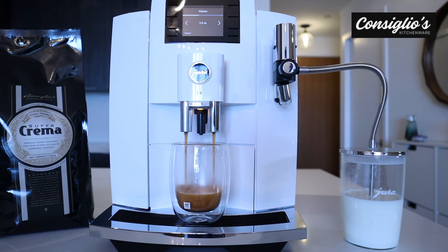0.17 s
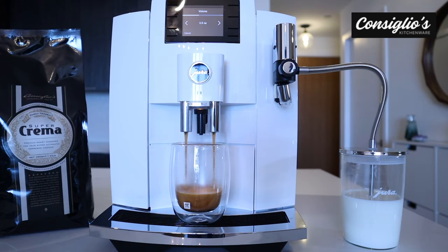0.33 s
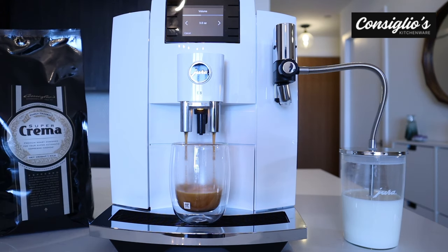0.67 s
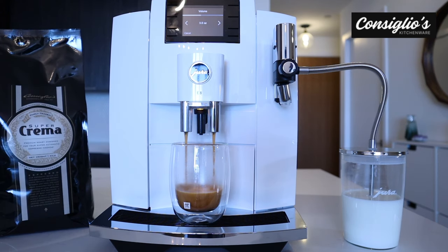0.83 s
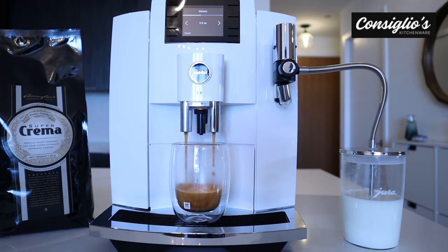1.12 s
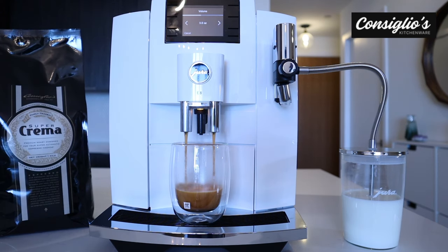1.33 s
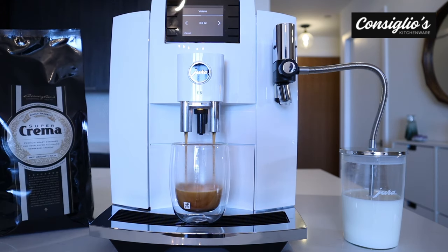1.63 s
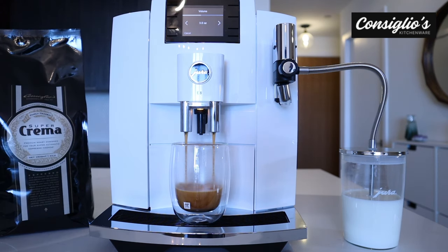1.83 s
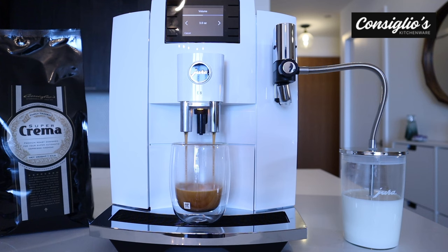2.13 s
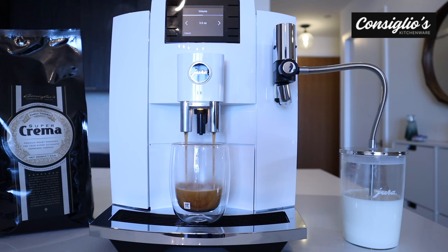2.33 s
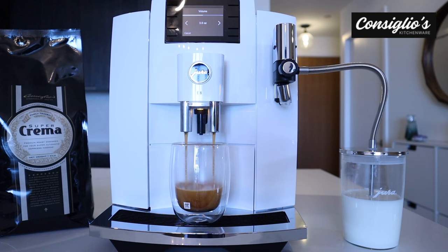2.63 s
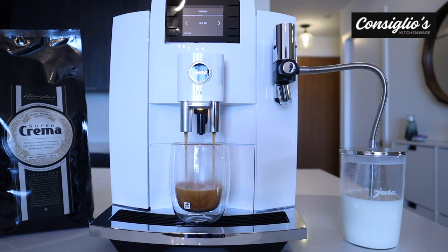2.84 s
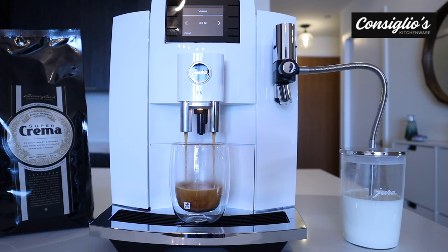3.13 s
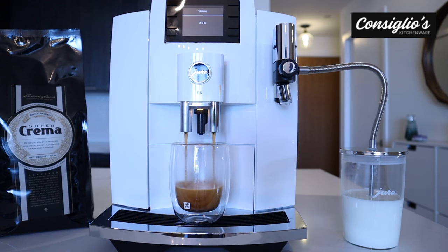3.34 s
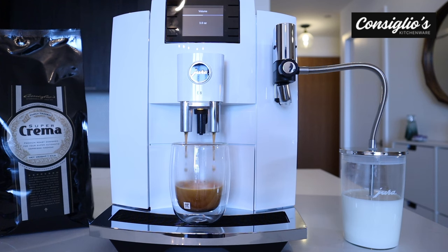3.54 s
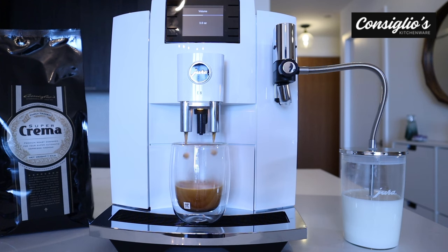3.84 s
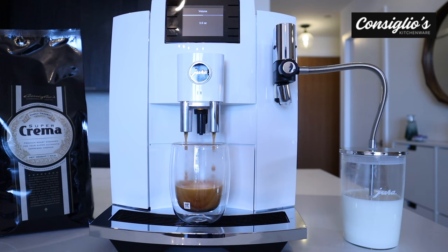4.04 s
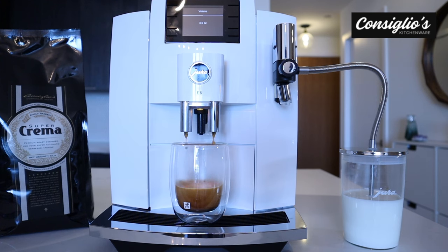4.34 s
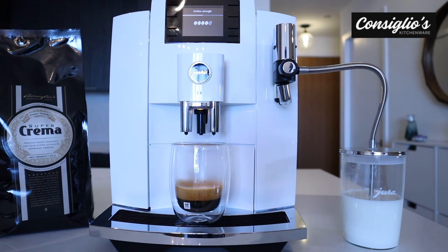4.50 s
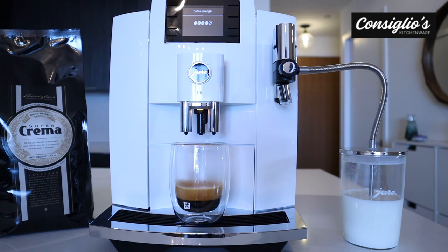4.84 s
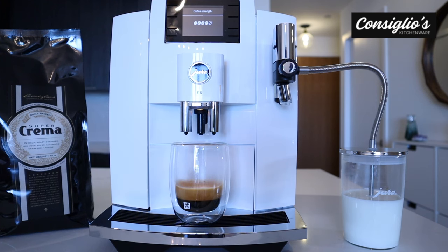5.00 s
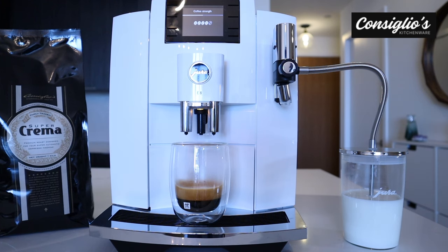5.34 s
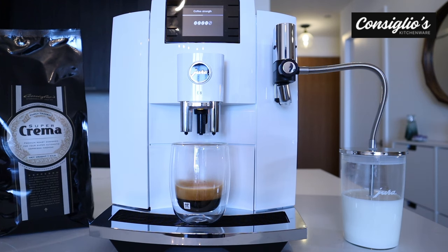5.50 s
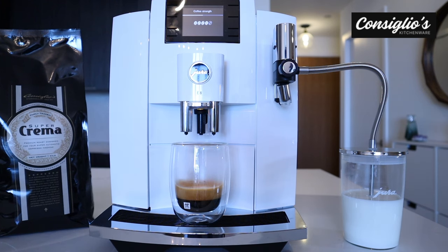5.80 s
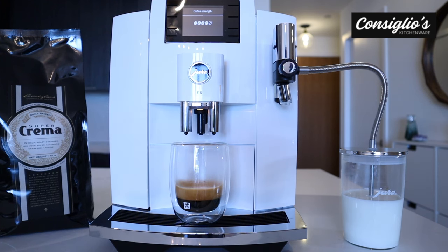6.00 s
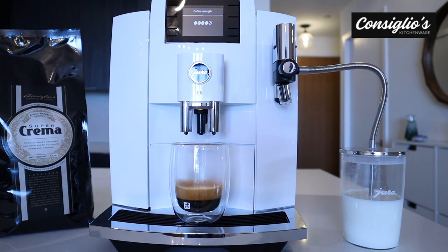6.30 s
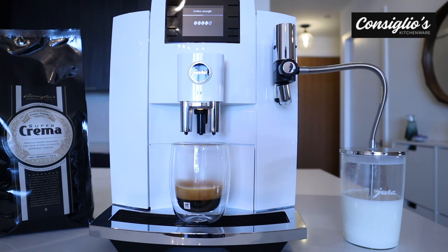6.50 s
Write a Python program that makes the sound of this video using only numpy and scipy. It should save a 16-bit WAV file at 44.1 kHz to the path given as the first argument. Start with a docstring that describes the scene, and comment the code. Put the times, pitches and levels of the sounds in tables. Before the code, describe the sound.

Rattling coffee machine pump and dribbling coffee, a quiet pause of clacks and drips, then a sudden harsh bean grinder with whine and squeals.

```python
"""Espresso machine, then grinder

An automatic espresso machine in a kitchen. Its vibration pump strokes on two mains cycles out of three, each stroke
ringing plunger and housing and squirting hiss, while coffee drips into a glass. The machine knocks, as struck modes,
when the pump stumbles and after it stops; valves snap as bursts of noise and the last drops fall. A thin whistle
rises and a relay clicks; then the grinder cracks beans in random clicks and noise, with whine, hum and squeals."""
import sys
import numpy as np
from scipy import signal
from scipy.fft import rfft, irfft, next_fast_len
from scipy.io import wavfile

SR = 44100
rng = np.random.default_rng(int(sys.argv[2]) if len(sys.argv) > 2 else 0)


def persist_wave(psi):
    """Save psi, clipped to +-1, as 16-bit WAV."""
    counts = np.round(np.clip(psi, -1, 1) * 32767).astype(np.int16)
    wavfile.write(sys.argv[1], SR, np.atleast_2d(counts).T)


N = 293706
MAINS_HZ = 60.015


def amp(db):
    """Turns dB into gain."""
    return 10 ** (np.asarray(db) / 20)


def rms_one(x):
    """Scales a sound to rms 1."""
    return x / np.sqrt(np.mean(x ** 2) + 1e-20)


def in_time(rows):
    """Draws straight lines between table rows: one curve per column after the time."""
    s, *columns = np.transpose(rows)
    return [np.interp(np.arange(N) / SR, s, column) for column in columns]


def ramp(s, length):
    """Rises from 0 to 1, starting at s."""
    return np.clip((np.arange(N) / SR - s) / length, 0, 1)


def clicks(s, size):
    """Single-sample impulses at the given times."""
    out = np.full(N, 1e-18)
    np.add.at(out, np.clip((np.asarray(s) * SR).astype(int), 0, N - 1), size)
    return out


def grains(per_s, spread_db):
    """Random clicks of either sign, mostly small, a few large."""
    sizes = amp(spread_db * np.minimum(rng.exponential(1, N), 4)) * rng.choice([-1, 1], N)
    return sizes * (rng.random(N) < per_s / SR) + 1e-18


def drift(rate):
    """Random wander of rms 1, faster for a higher rate."""
    r = np.exp(-80 * np.pi * rate / SR)   # one step every 40 samples
    steps = rng.standard_normal(N // 40 + 2002)
    slow = signal.lfilter([1], [1, -2 * r, r * r], steps)[2000:]
    return np.interp(np.arange(N) / 40, np.arange(len(slow)), rms_one(slow))


def ring(x, hz, t60):
    """A unit click sets a sine of height 1 ringing; it falls 60 dB in t60 seconds."""
    r = 10 ** (-np.log10(1000) / (t60 * SR))
    w = 2 * np.pi * hz / SR
    return signal.lfilter([0, np.sin(w)], [1, -2 * r * np.cos(w), r * r], x)


def strike(s, db, modes, scatter_db, sense=-1):
    """Each blow strikes every mode with a strength of its own; with sense -1 neighbouring modes start opposed."""
    scatter = scatter_db * rng.standard_normal((len(s), len(modes)))
    out = 0
    for k, (hz, level_db, t60) in enumerate(modes):
        blows = clicks(s, amp(db + level_db + scatter[:, k]))
        out = out + sense ** k * ring(blows, hz, t60)
    return out


def fade(x, t60):
    """Envelope that jumps at each click and dies away."""
    return signal.lfilter([1], [1, -amp(-60 / (t60 * SR))], x)


def soften(x, hz):
    """A yielding contact: two one-pole low-passes."""
    r = np.exp(-2 * np.pi * hz / SR)
    return signal.lfilter([(1 - r) ** 2], [1, -2 * r, r * r], x)


def dip(x, hz, width, depth):
    """Takes away part of a narrow band."""
    return x - np.clip(depth, 0, 1) * signal.lfilter(*signal.iirpeak(hz, hz / width, fs=SR), x)


def hiss(spectrum, envelope):
    """Half-octave bands of noise, together rms 1 before each is shaped by envelope(Hz)."""
    edges = 24 * 2 ** np.arange(0, 9.6, .5)
    white = rng.standard_normal((2, N))   # neighbouring bands use different noise
    centres = np.sqrt(edges[1:] * edges[:-1])
    hz, db = np.transpose(spectrum)
    gains = amp(np.interp(np.log(centres), np.log(hz), db))
    gains /= np.sqrt(np.sum(gains ** 2 * np.diff(edges)) * 2 / SR)
    out = 0
    for k, (gain, centre, low, high) in enumerate(zip(gains, centres, edges, edges[1:])):
        band = signal.butter(2, [low, high], "band", fs=SR, output="sos")
        out = out + gain * envelope(centre) * signal.sosfilt(band, white[k % 2])
    return out


# Colour of the background noise. Each row: pitch in Hz, relative level in dB per Hz.
KITCHEN_COLOUR = [(25, 9), (45, 4), (90, 6.5), (125, 3), (170, 4), (240, 5), (340, 1.5), (500, -3),
                  (800, -12), (1200, -4), (1700, -14.5), (3500, -11.5), (6000, -29), (15500, -72.5)]
# Loudness of the background noise. Each row: time in seconds, level in dB.
KITCHEN_LEVEL = [(2.5, -46), (2.62, -46), (2.75, -51.5), (3.2, -57.5), (3.6, -51), (4.4, -54.5)]
HUM_DB = -59


def kitchen():
    """A low background of flickering noise bands, and a faint sine at twice the mains frequency."""
    noise = hiss(KITCHEN_COLOUR, lambda hz: amp(0.5 * drift(28)))
    hum = amp(HUM_DB + drift(3.2)) * np.sin(4 * np.pi * MAINS_HZ * np.arange(N) / SR)
    return amp(in_time(KITCHEN_LEVEL)[0]) * noise + hum


# How the pump's loudness moves. Each row: time in seconds, housing gain in dB, plunger and squirt gain in dB.
PUMP_LEVEL = [(0.0, -2, -0.5), (2.5, -0.5, 0)]
# Runs in which every third mains cycle is a rest. Each row: first resting cycle, last resting cycle.
RESTS = [(-29, 10), (12, 57), (62, 107), (109, 151)]
# Housing shaken by the pump. Each row: pitch in Hz, relative level in dB, time to fall 60 dB in seconds.
HOUSING = [(58, -49, 0.35), (96.4, -42, 0.48), (120.8, -57, 0.66), (159.8, -24.5, 0.37),
           (178.15, -26.5, 0.25), (251.6, -33, 0.42), (296.2, -33, 0.13), (320.9, -39.5, 0.31),
           (341.7, -41.5, 0.37), (377, -36, 0.063), (446.6, -39, 0.12), (462.5, -42.5, 0.18),
           (518.6, -40.5, 0.35), (551, -40, 0.54), (596, -41, 0.2), (668, -53, 0.23), (734, -51, 0.2),
           (837, -50, 0.15)]
# Plunger and spring. Each row: pitch in Hz, relative level in dB, time to fall 60 dB in seconds.
PLUNGER = [(1170, -65, 0.078), (1279, -44.5, 0.18), (1341, -45.5, 0.21), (1560, -32, 0.0083),
           (1548, -39.5, 0.068), (1633, -31.5, 0.1), (1720, -45, 0.12), (1824, -36.5, 0.065),
           (1970, -45, 0.1), (2237, -35, 0.023), (2447, -48, 0.17), (2670, -41, 0.07), (2870, -43, 0.016),
           (3860, -53, 0.079), (4395, -51.5, 0.054), (5200, -75, 0.028), (6000, -54, 0.023),
           (6470, -43.5, 0.019), (8450, -51, 0.037)]
# Water forced through the valve. Each row: pitch in Hz, relative level in dB per Hz.
SQUIRT = [(300, -45), (600, -5), (850, -11), (1200, -10), (1900, -7), (2700, -9), (4000, -17), (6300, -13),
          (8400, -29), (10000, -30), (11700, -20), (15500, -31)]
FIRST_STROKE_S, STROKE_CYCLES = .0102, 151
SECOND_STROKE_DB, RETURN_S, RETURN_DB = -2, .0065, -8
PULL_S = -0.0027   # the coil pulls shortly before the plunger lands
SHOVE_SCATTER_DB, STUMBLE_DB = .7, 1   # the stroke that opens a new run kicks harder
WANDER_DB = 2.5   # each housing mode above 200 Hz swells and sinks slowly
SQUIRT_DB, FLOW_DB = -42, -49   # bursts at each blow, and a steady flow beneath
TREBLE_FADE = .12   # how much sooner the treble of a squirt dies


def pump():
    """The plunger slams its stop on each powered cycle, springs back and shakes the housing."""
    cycle = np.arange(RESTS[0][0], STROKE_CYCLES)
    rests = np.concatenate([np.arange(first, last + 1, 3) for first, last in RESTS])
    resting = np.isin(cycle, rests)
    strokes = cycle[~resting]
    s = FIRST_STROKE_S + strokes / MAINS_HZ
    after_rest = np.roll(resting, 1)[~resting]
    db = SECOND_STROKE_DB * ~after_rest   # a stroke after a rest lands harder

    lead = SR // 2   # the housing is already ringing at the start
    shoves = np.zeros(N + 2 * lead)
    opens_run = np.isin(strokes, [first - 1 for first, _ in RESTS])
    shove_db = SHOVE_SCATTER_DB * rng.standard_normal(len(s)) + STUMBLE_DB * opens_run
    shoves[(s * SR).astype(int) + lead] = amp(shove_db)
    housing = 0
    for k, (hz, level_db, t60) in enumerate(HOUSING):
        # the pull rocks the whole housing, the rebound rings its panels
        delay_s = PULL_S if hz < 200 else RETURN_S
        ringing = ring(shoves, hz, t60)[lead - int(SR * delay_s):][:N]
        housing = housing + (-1) ** k * amp(level_db + WANDER_DB * (hz > 200) * drift(1.6)) * ringing

    s, db = s[s > 0], db[s > 0]
    s = s + 3e-5 * rng.standard_normal(len(s))
    plunger = strike(s, db, PLUNGER, scatter_db=1.2)
    plunger = plunger + strike(s + RETURN_S, db + RETURN_DB, PLUNGER, scatter_db=2)

    blows = clicks(s, amp(db + 0.64 * rng.standard_normal(len(s)))) + clicks(s + RETURN_S, amp(-10.5))
    spit = 0.27 * drift(37)   # the jet spits unevenly, most in the treble
    flow = amp(FLOW_DB) * np.interp(np.arange(N) / SR, [2.53, 2.65], [1, 0])

    def squirt_envelope(hz):
        burst = soften(fade(blows, 0.069 * (2000 / hz) ** TREBLE_FADE), 320)
        burst = amp(SQUIRT_DB) * burst * amp(np.log2(hz / 500) * spit)
        return burst + flow * (1000 / hz) ** 0.62

    squirt = hiss(SQUIRT, squirt_envelope)
    housing_db, plunger_db = in_time(PUMP_LEVEL)
    return amp(housing_db) * housing + amp(plunger_db) * (soften(plunger, 6600) + squirt)


# Single drops into the glass. Each row: start in seconds, then the levels of snap, glass tone and spray in dB.
DROPS = [(0.0957, -33.5, -55, -48), (0.197, -26.5, -32, -41), (0.317, -35, -43, -52),
         (0.627, -34, -47, -48), (0.648, -26, -17, -40), (0.848, -27, -25, -40), (0.9425, -36, -35, -48),
         (1.026, -26, -35, -42), (1.048, -26.5, -17.5, -42), (1.058, -32, -38, -46), (1.083, -40, -43, -52),
         (1.253, -33, -27, -46), (1.316, -28.5, -24, -46), (1.363, -28, -19, -47), (1.496, -24, -26, -51),
         (1.571, -35, -50, -50), (1.6592, -32, -41, -50), (2.0675, -45, -50, -45), (3.165, -34.5, -39, -51),
         (3.3873, -35, -36, -48), (3.425, -39, -22, -58), (3.4338, -37, -26, -50), (3.4632, -39, -49, -57),
         (3.48, -27.5, -21.5, -45), (3.5, -42, -40, -57), (3.547, -38, -43, -52),
         (3.566, -30.5, -26.5, -44), (3.582, -44, -47, -58), (3.612, -50, -47, -58), (3.653, -45, -44, -60),
         (3.719, -32.5, -31, -56), (3.738, -49, -32, -62), (3.781, -40, -35, -54), (3.802, -43, -36, -58),
         (3.823, -43, -43, -60), (3.8413, -29, -45, -50), (3.965, -41, -44, -60), (3.9935, -44, -55, -62),
         (4.034, -44, -45, -62), (4.0594, -43, -38, -57), (4.1413, -40, -37, -54), (4.197, -41, -37, -60),
         (4.2437, -44, -45, -60), (4.2746, -35.5, -31, -54), (4.291, -47, -33, -60), (4.325, -43, -54, -57),
         (4.35, -50, -48, -65), (4.385, -47, -45, -62), (4.421, -37, -38, -54)]
# Fine spatter, steady within each stage of the brew. Each row: start in seconds, drops per second, level in dB.
SPATTER = [(0, 56, -47), (2.55, 17.6, -73), (3.38, 60, -59)]
# Snap of the surface. Each row: pitch in Hz, relative level in dB, time to fall 60 dB in seconds.
TICK = [(2590, -8, 0.0085), (3300, 1, 0.0036), (3960, -4.5, 0.0054)]
# Air in the glass. Each row: pitch in Hz, relative level in dB, time to fall 60 dB in seconds.
GLASS = [(570, -13.5, 0.029), (987, -5, 0.0078), (1186, -1.5, 0.014), (1650, -25.5, 0.052)]
# Thrown droplets. Each row: pitch in Hz, relative level in dB, time to fall 60 dB in seconds.
SPRAY = [(7240, -1, 0.0043), (8850, 2.5, 0.0045), (11700, 4, 0.0025), (14000, 4, .003)]
SPATTER_END_S = 4.5
SPLASH_S, SPLASH_LENGTH_S, SPLASH_PER_S, SPLASH_DB = 0.96, 0.11, 700, -43   # one burst of spatter
MIST_DB = -23   # gain of the spatter's spray
SNAP_LOW_HZ, SNAP_HIGH_HZ = 1900, 4800   # a snap is thin: little below or above


def drops():
    """Each drop snaps on the surface, throws spray and sounds the air in the glass."""
    t = np.arange(N) / SR
    start, stage_per_s, stage_db = np.transpose(SPATTER)
    stage = np.searchsorted(start[1:], t)
    splash = (t > SPLASH_S) & (t < SPLASH_S + SPLASH_LENGTH_S)
    per_s = np.where(splash, SPLASH_PER_S, stage_per_s[stage])
    small_db = np.where(splash, SPLASH_DB, stage_db[stage])
    small = amp(small_db) * grains(per_s * (t < SPATTER_END_S), spread_db=2)
    patter = sum(amp(db) * ring(small, hz, t60) for hz, db, t60 in TICK)
    plink = sum(amp(db) * ring(small, hz, t60) for hz, db, t60 in GLASS)
    mist = sum(amp(db + MIST_DB) * ring(small, hz, t60) for hz, db, t60 in SPRAY)

    s, snap_db, tone_db, spray_db = np.transpose(DROPS)
    snap = strike(s, snap_db, TICK, scatter_db=3.9, sense=1)
    tone = strike(s, tone_db, GLASS, scatter_db=3.9, sense=-1)
    spray = strike(s, spray_db, SPRAY, scatter_db=3.9, sense=1)
    thin = signal.butter(3, [SNAP_LOW_HZ, SNAP_HIGH_HZ], "band", fs=SR, output="sos")
    snaps = signal.sosfilt(thin, snap + patter)
    return snaps + soften(tone + amp(6) * plink, 4900) + spray + mist


# Knocks of the machine: two as the pump stumbles, the others after it stops. Each row: start in seconds,
# relative level in dB, hardness in dB per octave, pitch favoured by the place of the blow in Hz,
# share of the free ring time.
KNOCKS = [(.236, -29, -3, 595, .3), (1.849, -18, -6, 450, 0.33), (3.191, -47, 0, 330, 0.81),
          (3.222, -24.5, 3, 252, 0.25), (3.432, -38.5, -3, 237, 0.86), (3.49, -41, 2, 240, .7),
          (3.66, -26, 3, 690, 0.76), (3.93, -28.5, 5.5, 960, 0.68), (3.986, -46, -2, 330, 2.7),
          (4.115, -48, 1, 252, 1.4), (4.29, -34, -3, 330, 0.57)]
# Knocked parts of the machine. Each row: pitch in Hz, relative level in dB, free time to fall 60 dB in seconds.
KNOCKED_PARTS = [(231, -22.5, 0.28), (245, -19, 0.11), (326, -18.5, 0.13), (577, -13, 0.079),
                 (666, -15.5, 0.063), (770, -26, 0.04), (950, -17.5, 0.037), (1250, -27, 0.052),
                 (1510, -28, .03), (1800, -13, 0.007), (2150, -29, 0.0076), (2640, -22.5, 0.011),
                 (3000, -34, .01), (3640, -30, 0.0083), (4700, -31, 0.011), (6640, -37, 0.0065)]
FAVOUR_DB, FAVOUR_OCTAVES = 9, 0.35


def knocks():
    """Harder knocks reach the higher modes more strongly; each favours the modes near one pitch and chatters."""
    out, size = np.zeros(N), SR // 2
    for s, db, hard_db, near_hz, share in KNOCKS:
        start = int(s * SR)
        chatter = soften(fade(clicks([0], 0.19), 0.039), 180) * rng.standard_normal(N)
        blow = (clicks([0, .004], 0.71) + chatter)[:size]
        for hz, level_db, t60 in KNOCKED_PARTS:
            favour_db = FAVOUR_DB * np.exp(-(np.log2(hz / near_hz) / FAVOUR_OCTAVES) ** 2)
            mode_db = db + level_db + hard_db * np.log2(hz / 700) + favour_db
            out[start:start + size] += rng.choice([-1, 1]) * amp(mode_db) * ring(blow, hz, t60 * share)
    return out


# Snaps of the valves. Each row: start in seconds, relative level in dB.
VALVES = [(2.579, -38.5), (2.604, -33.5), (2.6795, -35.5), (2.728, -32), (2.823, -30), (2.8635, -34.5),
          (2.909, -46)]
# Colour of a snap. Each row: pitch in Hz, relative level in dB per Hz.
VALVE_COLOUR = [(88, -41), (150, -8), (234, -1.5), (509, -1.5), (796, -11), (948, -6), (2550, -10.5),
                (2920, -10), (3690, -12), (15500, -25)]
# Ringing plastic. Each row: pitch in Hz, relative level in dB, time to fall 60 dB in seconds.
VALVE_BODY = [(502, -29.5, 0.035), (1000, -25, 0.028), (1920, -29, .02), (2600, -28, 0.021)]
VALVE_T60_S = 0.057   # at 2000 Hz
THUD_S, THUD_HZ, THUD_DB, THUD_T60_S = 2.83, 44.8, -35, 1   # the counter takes a soft jolt


def valves():
    """A snap of rattling plastic and released pressure; the treble dies first."""
    length = 9000   # samples
    def envelope(hz):
        t60 = VALVE_T60_S * (2000 / hz) ** .3
        out = np.zeros(N)
        for s, db in VALVES:
            start = int(s * SR)
            out[start:start + length] += amp(db - 60 * np.arange(length) / (SR * t60))
        return out

    pressure = hiss(VALVE_COLOUR, lambda hz: soften(envelope(hz), hz / 4))
    rattle = soften(envelope(1000), 150) * rng.standard_normal(N)
    body = sum(amp(db) * ring(rattle, hz, t60) for hz, db, t60 in VALVE_BODY)
    thud = amp(THUD_DB) * ring(soften(clicks([THUD_S], 0.79), 33), THUD_HZ, THUD_T60_S)
    return pressure + body + thud


# A thin whistle. Each row: pitch in Hz, width of each resonance in Hz, level in dB.
WHISTLE = [(8660, 260, -72), (9620, 280, -74)]
WHISTLE_S, WHISTLE_RISE_S = 3.6, .45


def whistle():
    """Noise passed twice through a narrow resonance."""
    out = 0
    for hz, width, db in WHISTLE:
        t60 = np.log(1000) / (np.pi * width)
        noise = ring(ring(rng.standard_normal(N), hz, t60), hz, t60)
        out = out + amp(db) * rms_one(noise)
    return out * ramp(WHISTLE_S, WHISTLE_RISE_S)


# Relay before the grinder. Each row: start in seconds, relative level in dB, pitch in Hz.
RELAY = [(4.474, -28, 970), (4.4945, -27, 2340), (4.504, -34, 2330), (4.513, -38, 2400), (4.524, -28, 2280)]
RELAY_SWELL_T60_S, RELAY_T60_S = 0.0073, 0.027


def relay():
    """Each contact rings one short note that swells for a moment."""
    out = 0
    for s, db, hz in RELAY:
        swell = ring(clicks([s], 0.03), hz, RELAY_SWELL_T60_S)
        out = out + amp(db) * ring(swell, hz, RELAY_T60_S)
    return out


SWAY_SHARE, SWAY_PER_S = .035, 5   # the low hopper modes shift in pitch as the beans shift


def sway(x, hz):
    """Reads a mode up to 1000 Hz a little faster or slower, so that its pitch wanders."""
    if hz > 1000:
        return x
    return np.interp(np.cumsum(1 + SWAY_SHARE * drift(SWAY_PER_S)) % N, np.arange(N), x)


# Colour of crushed beans. Each row: pitch in Hz, relative level in dB per Hz.
CRUSH = [(21, -55), (35, -47), (85, -33), (107, -42), (158, -13), (203, -25), (237, -11), (269, -2),
         (657, 0), (1010, -6), (3360, -10.5), (3720, -16), (6030, -21), (15500, -50)]
# Burrs and hopper. Each row: pitch in Hz, width in Hz, relative level in dB.
HOPPER = [(169.3, 14, -5), (391, 27, 3), (410.4, 35, -4), (452, 120, -12.5), (632, 11, -12), (651, 43, 1.5),
          (794, 24, -11), (837, 37, -3), (1020, 27, -32), (1214, 65, -9), (1364, 100, -13.5),
          (1738, 21, -7), (2066, 41, -8), (2160, 26, -6.5), (3160, 32, -11.5), (3262, 95, -9.5),
          (4085, 39, -14.5), (4266, 42, -13), (4377, 70, -15.5), (4570, 41, -20), (5390, 74, -21),
          (5950, 160, -18.5), (6640, 110, -23.5), (8330, 77, -26), (8830, 45, -25.5), (11910, 50, -27.5)]
# A hard bean jams the burrs. Each row: time in seconds, treble flare in dB before its weighting by pitch.
JAMS = [(4.72, 3), (4.97, 2), (5.24, 5), (5.7, 4), (6.43, 4)]
# The casing passes little here. Each row: pitch in Hz, width in Hz, depth from 0 to 1.
CASING_DIPS = [(544, 10, 0.83), (3590, 50, 0.9), (4510, 80, 0.6)]
# A dull, quiet grinding noise, then within 12 ms the full grind.
QUIET_S, FULL_S, FULL_RISE_S = 4.494, 4.532, .012
QUIET_DB, GRIND_DB = -29, -17
SETTLE_DB, SETTLE_S = 0.5, 0.86   # the full grind starts a little louder, then settles
DULL_DB, DULL_HZ = 9, 2300   # the quiet grinding is held back above this
FLARE_S = .07


def beans():
    """Beans crack between the burrs by the thousand, as bursts of noise and clicks that ring the hopper."""
    t, full = np.arange(N) / SR, ramp(FULL_S, FULL_RISE_S)
    settle_db = SETTLE_DB * (1 - ramp(FULL_S, SETTLE_S))
    load_db = QUIET_DB + np.sqrt(full) * (GRIND_DB - QUIET_DB + settle_db)
    flare_db = sum(db * np.clip(1 - np.abs(t - s - FLARE_S / 2) / FLARE_S, 0, 1) for s, db in JAMS)
    dull_db = DULL_DB * ramp(QUIET_S, 0.0092) * (1 - full)

    def tilt_db(hz):
        treble = np.clip(np.log2(hz / 1200) / 7.2, 0, 1)
        dulled = (hz > DULL_HZ) + 1.4 * (hz < 750)   # the bass is held back too
        return flare_db * treble - dull_db * dulled

    surge = drift(12.7)
    cracks = fade(np.abs(grains(230, spread_db=2.5)), 0.11)
    grit = np.sqrt(1 + 0.19 * rms_one(cracks) ** 2)   # larger cracks flare across all bands
    crush = hiss(CRUSH, lambda hz: grit * amp(tilt_db(hz) + 0.62 * surge + 0.38 * drift(23)))
    chips = grains(2500, spread_db=1.0) * grit
    hopper = 0
    for hz, width, db in HOPPER:
        mode = rms_one(ring(chips, hz, np.log(1000) / (np.pi * width)))
        hopper = hopper + amp(db + tilt_db(hz) + 2.0 * drift(7.1)) * np.sqrt(width) * sway(mode, hz)
    no_bass = signal.butter(6, 140, "high", fs=SR, output="sos")
    out = signal.sosfilt(no_bass, amp(-3.5) * crush + amp(-3.0) * rms_one(hopper))
    for hz, width, depth in CASING_DIPS:
        out = dip(out, hz, width, depth)
    return (t > QUIET_S) * amp(load_db) * out


# Mains hum of the grinder motor. Each row: pitch in Hz, level in dB rms.
MOTOR = [(120, -40), (240, -29.5)]


def motor():
    """Two slightly unsteady mains tones and a low rumble of resonant noise."""
    t, hum = np.arange(N) / SR, 0
    for hz, db in MOTOR:
        phase = 2 * np.pi * hz * t + 0.11 * drift(4.6)
        hum = hum + amp(db + 0.44 * drift(13)) * np.sqrt(2) * np.sin(phase)
    return hum + amp(-50.5) * rms_one(ring(rng.standard_normal(N), 64, 0.057))


# Gear whine, sagging under load. Each row: time in seconds, pitch in Hz, peak level in dB.
WHINE = [(4.55, 3360, -33), (4.71, 3350, -34), (4.76, 3260, -39), (4.82, 3444, -41), (4.93, 3450, -32),
         (5.0, 3395, -31), (5.07, 3230, -25), (5.12, 3220, -35), (5.17, 3420, -35), (5.23, 3400, -25),
         (5.3, 3265, -36), (5.34, 3410, -30), (5.44, 3470, -33), (5.55, 3360, -31), (5.64, 3454, -42),
         (5.72, 3420, -28), (5.79, 3260, -23), (5.87, 3370, -31), (5.97, 3435, -32), (6.08, 3400, -42),
         (6.2, 3430, -34.5), (6.36, 3360, -27.5), (6.43, 3400, -33), (6.52, 3205, -22.5), (6.66, 3070, -30)]
WHINE_FLUTTER_DB, WHINE_WAVER_HZ = 2.5, 18


def whine():
    """The gears sing one tone whose pitch and level follow the table and flutter."""
    hz, db = in_time(WHINE)
    phase = 2 * np.pi * np.cumsum(hz + WHINE_WAVER_HZ * drift(41.0)) / SR
    return amp(db + WHINE_FLUTTER_DB * drift(35)) * np.sin(phase)


# The burrs squeal briefly. Each row: start in seconds, length in seconds, start pitch in Hz, end pitch in Hz,
# peak level in dB.
SQUEALS = [(4.77, 0.093, 825, 833, -24), (4.898, 0.15, 860, 804, -23), (5.099, 0.12, 805, 827, -23),
           (5.312, 0.19, 825, 839, -22.5), (5.877, 0.21, 815, 850, -22), (6.241, .12, 830, 803, -21),
           (4.817, 0.13, 2750, 2810, -32), (4.878, 0.097, 1770, 1770, -28), (5.326, 0.19, 1730, 1740, -26),
           (5.55, 0.22, 2790, 2770, -32), (5.677, .18, 1140, 1137, -26.5),
           (5.685, 0.088, 1743, 1726, -26.5), (5.906, .09, 1707, 1736, -24),
           (5.973, 0.203, 2810, 2740, -32.5), (6.079, 0.11, 1804, 1760, -28),
           (6.227, 0.18, 3120, 3090, -32), (6.547, 0.062, 1440, 1324, -21), (6.617, 0.037, 1180, 1320, -18),
           (6.429, 0.085, 1190, 1156, -31)]
SQUEAL_RISE_S = 0.021


def squeals():
    """Each squeal is a slightly unsteady tone that glides from its start to its end pitch."""
    waver, flutter = 9 * drift(25), amp(2.5 * drift(30))   # Hz, gain
    out = 0
    for s, length, start_hz, end_hz, db in SQUEALS:
        hz = start_hz + (end_hz - start_hz) * ramp(s, length) + waver
        envelope = ramp(s, SQUEAL_RISE_S) * (1 - ramp(s + length - SQUEAL_RISE_S, SQUEAL_RISE_S))
        out = out + amp(db) * envelope * np.sin(2 * np.pi * np.cumsum(hz) / SR)
    return flutter * out


def grinder():
    """A dull, quiet grinding of beans, then the full grind with hum, whine and squeals."""
    hum_rise = np.interp(np.arange(N) / SR, [4.53, 4.57], [0, 1])
    return beans() + hum_rise * (motor() + whine()) + squeals()


ROOM_T60_S, ROOM_CUT_HZ, ROOM_DB = 0.72, 2000, -19   # the ring time is halved at the cut


def room(x):
    """Eight feedback delays, duller in the treble."""
    size = next_fast_len(N + SR)
    hz = np.arange(size // 2 + 1) * SR / size
    t60 = ROOM_T60_S / (1 + hz / ROOM_CUT_HZ)
    tail = 0
    for k, lag in enumerate(rng.uniform(0.0087, .035, 8)):
        echo = amp(-60 * lag / t60) * np.exp(-2j * np.pi * hz * lag)
        tail = tail + (-1) ** k * echo / (1 - echo)
    return irfft(rfft(x, size) * tail, size)[:N]


def scene():
    """The small sounds carry a little room; the rest is close and dry."""
    background = kitchen() + pump()
    small = drops() + knocks() + valves() + relay()
    return (background + small + amp(ROOM_DB) * room(small) + whistle() + grinder())[None]


MIC_HISS_DB, MIC_LOW_HZ, CUTOFF_HZ = -62.5, 35.7, 15900


def record(dry):
    """The microphone adds hiss and drops the deepest bass; the top is cut."""
    heard = dry + amp(MIC_HISS_DB) * rng.standard_normal(N)
    heard = signal.sosfilt(signal.butter(4, MIC_LOW_HZ, "high", fs=SR, output="sos"), heard)
    return signal.sosfilt(signal.cheby2(16, 48, CUTOFF_HZ, fs=SR, output="sos"), heard)


dry = scene()
out = record(dry)
persist_wave(out)
```